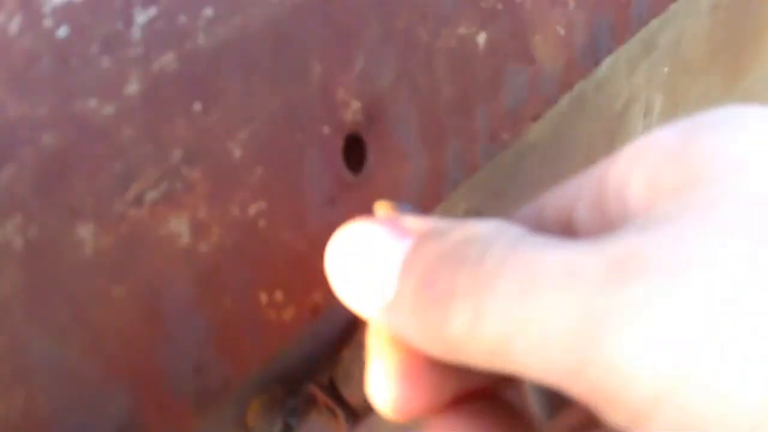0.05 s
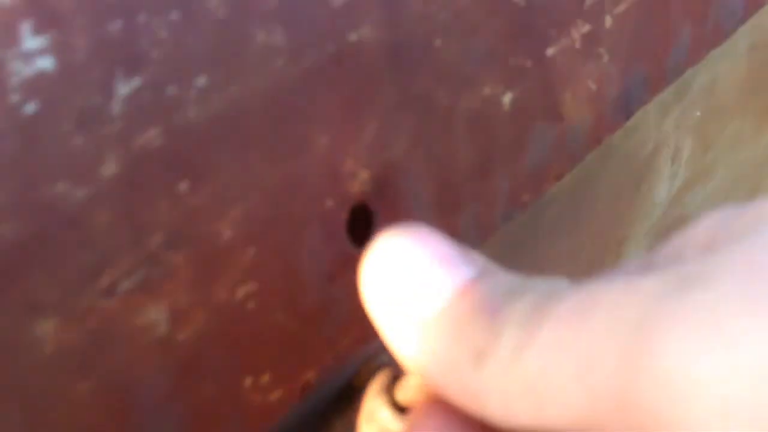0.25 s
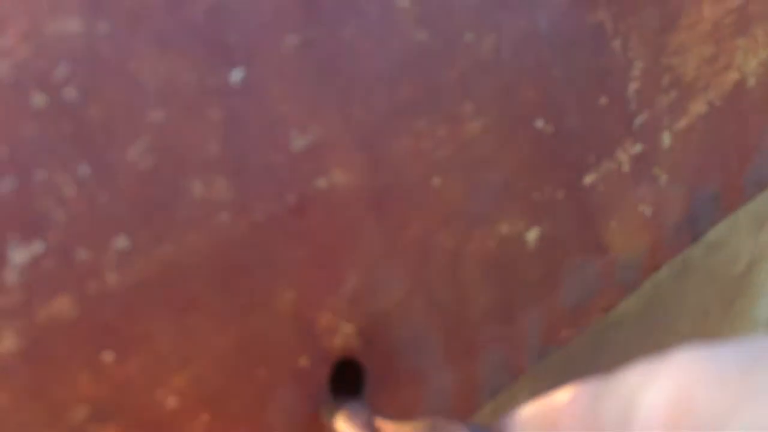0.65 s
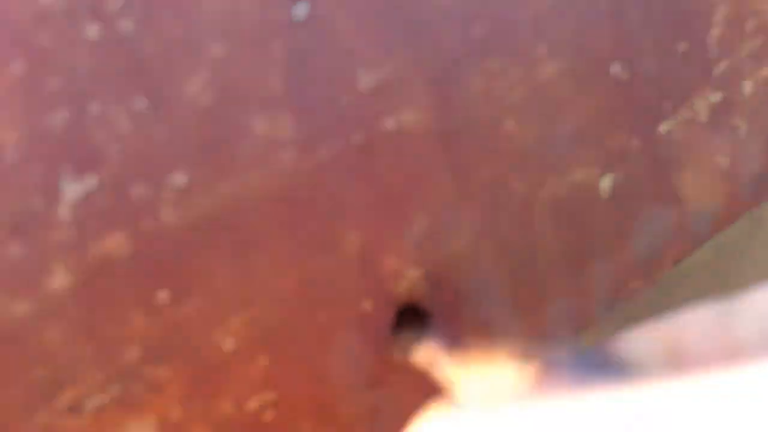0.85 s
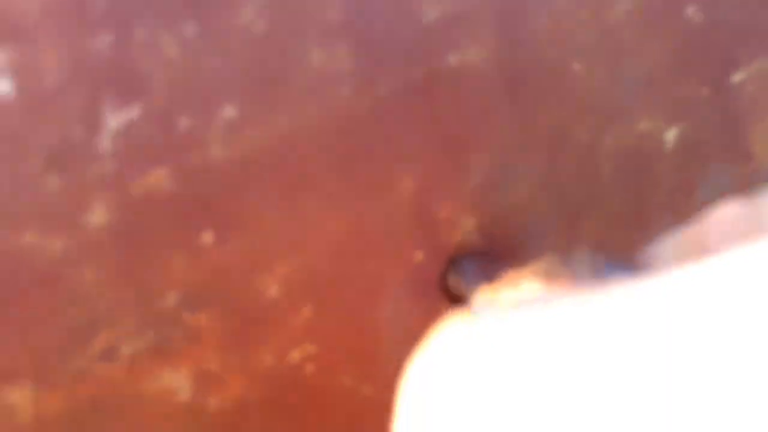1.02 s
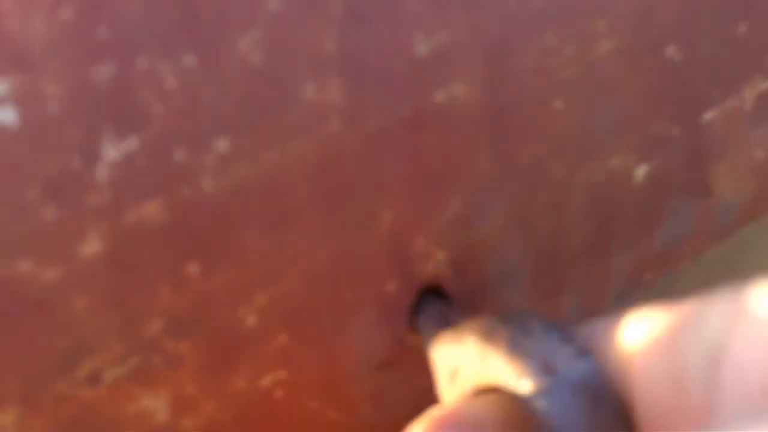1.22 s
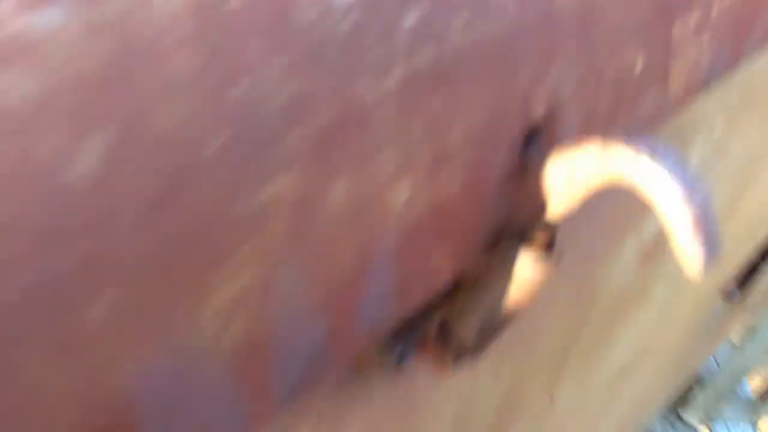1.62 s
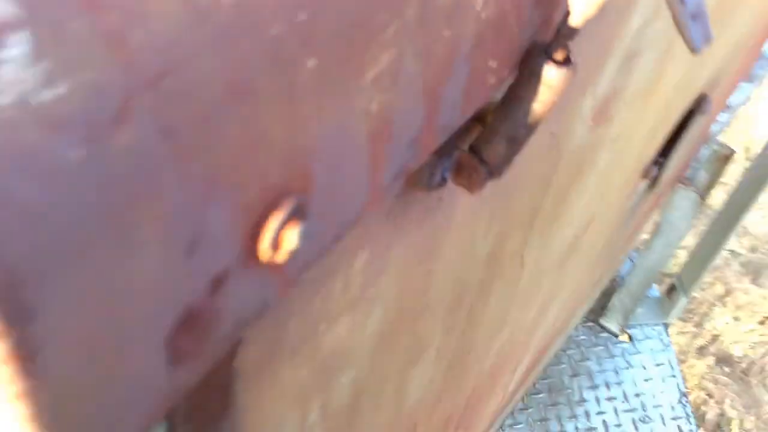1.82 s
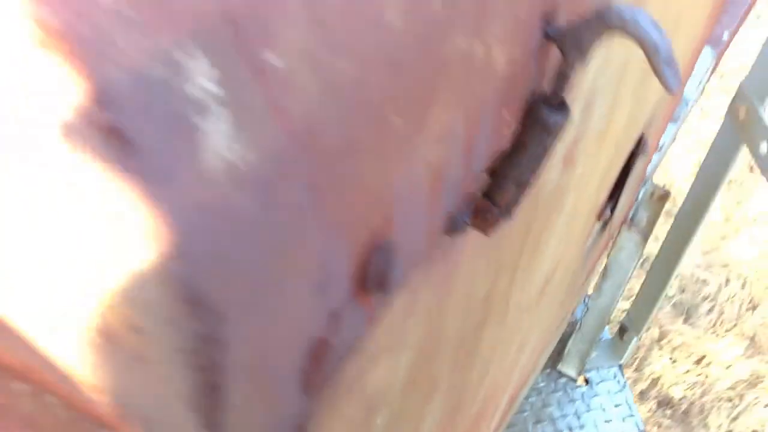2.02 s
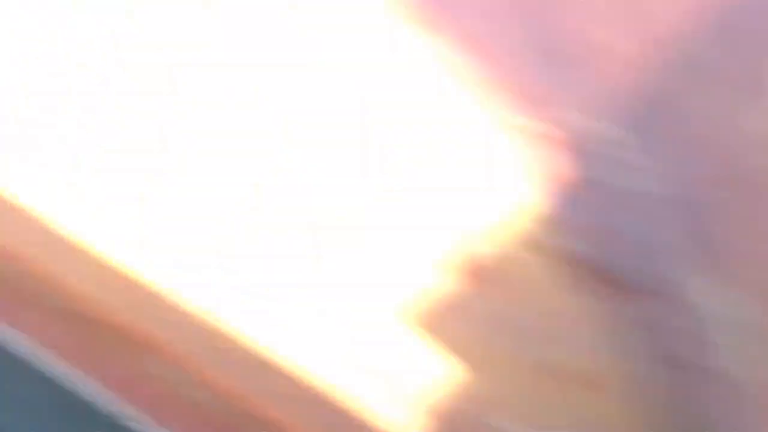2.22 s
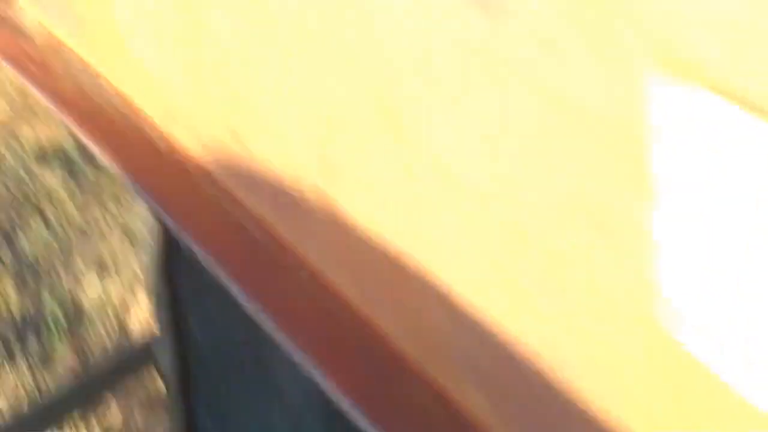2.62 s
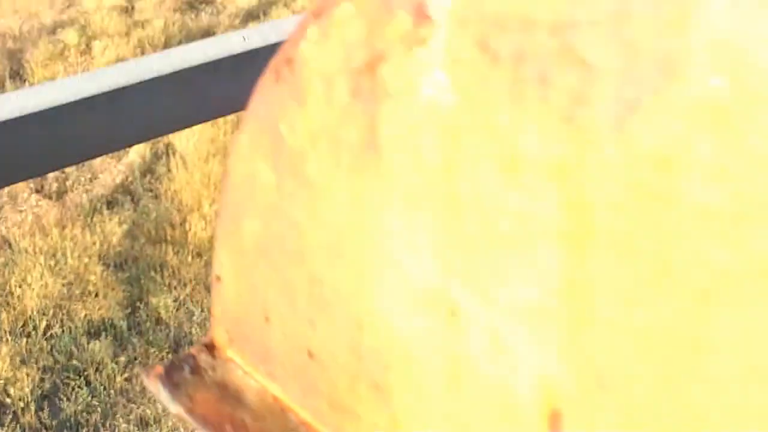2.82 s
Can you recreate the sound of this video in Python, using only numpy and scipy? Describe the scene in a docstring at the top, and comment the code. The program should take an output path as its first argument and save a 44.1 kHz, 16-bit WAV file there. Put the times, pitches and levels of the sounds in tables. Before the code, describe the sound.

Outdoors over a wind rumble, close, booming clangs ring from a steel sheet as a rusty hook is worked into it, with small pings and scratches. Then the microphone is bumped and a gritty scrape judders and catches.

```python
"""Outdoors, over a rumble of wind, a rusty hook latch is worked into a hole in a big sheet-steel panel.
The sheet is already ringing faintly as the hook's tip scratches over rust, close to the microphone.
Each knock booms and clangs in the sheet; on some the hook pings, and the hardest overload the microphone.
Then come dull handling bumps and, from about two seconds, a dry, gritty scrape that judders and catches."""
import sys
import numpy as np
from scipy import signal
from scipy.fft import rfft, irfft, next_fast_len
from scipy.io import wavfile
from scipy.ndimage import map_coordinates

SR = 44100
rng = np.random.default_rng(int(sys.argv[2]) if len(sys.argv) > 2 else 0)


def generate_wav(signal):
    """Clip the signal to [-1, 1] and save it as 16-bit WAV at the path in sys.argv[1]."""
    frames = np.transpose(np.atleast_2d(signal))
    scaled = np.clip(frames, -1, 1) * 32767
    pcm = np.round(scaled).astype(np.int16)
    wavfile.write(sys.argv[1], SR, pcm)


N = 130095
T = np.arange(N) / SR
JUDDER_PER_S = 130  # flutter of anything dragged over the surface
# the hook knocks on the panel:
# (time [s], boom [dB], clang [dB], click [dB], note of the struck spot [Hz], note level [dB])
KNOCK_HITS = [(.216, -20.5, -31, -32, 250, -25), (.351, -16.5, -29, -29, 509.7, -7.5),
              (0.392, -35, -37, -48, 372, -23), (.437, -26.5, -37.5, -36, 237, -18.5),
              (.543, -21.5, -32.5, -26, 497, -11.5), (.560, -19.5, -31.5, -24, 221, -9),
              (0.647, -15, -24.5, -24.5, 450, -32), (0.697, -13.5, -11.5, -2.5, 231, 1.5),
              (0.725, -13.5, -27, -13.5, 347, -8.5), (.751, -28, -33, -16, 676, -13),
              (.761, -49, -20.5, -21, 477, -12), (.891, -10.5, -21.5, -17, 590, -4.5),
              (.908, -11, -11.5, -14.5, 515, -22), (.946, -15.5, -45, -42, 643, -7.5),
              (1.031, -22.5, -37.5, -32.5, 244, -37), (1.065, -16.5, -36, -30.5, 230, -5),
              (1.079, -24, -26, -32, 177, -9.5), (1.112, -10.5, -22, -28, 230.6, -3.5),
              (1.125, -7.5, -11, -16, 465.6, -2), (1.163, -24, -22, -22, 174, -4),
              (1.186, -11.5, -30, -13.5, 329, -11), (1.191, -19, -9, -6.5, 158.7, -4.5),
              (1.222, -14, -19, -30, 640, -20), (1.256, -16.5, -46, -42, 467, -3)]


def amp(db):
    """Decibels to gain."""
    return 10 ** (np.asarray(db) / 20)


def unit(x):
    """Scale to rms 1."""
    return x / np.sqrt(np.mean(x ** 2))


def on_log(hz, points):
    """Read (Hz, value) points on a log-frequency axis."""
    freqs, values = np.array(points).T
    return np.interp(np.log(hz + 1e-3), np.log(freqs), values)


def curve(points):
    """Gain envelope from (s, dB) points."""
    return amp(np.interp(T, *np.array(points).T))


def fade(t60):
    """Free decay by 60 dB in t60 seconds."""
    return np.exp(-np.log(1000) * T / t60)


def swell(at, length):
    """A half-sine rise and fall."""
    return np.sin(np.pi * np.clip((T - at) / length, 0, 1))


def wander(axis, step):
    """Random values one step apart along an axis, joined by lines."""
    knots = np.arange(int(axis[-1] / step) + 2)
    return np.interp(axis / step, knots, rng.standard_normal(N)[:len(knots)])


def add(out, at, x):
    """Mix x in from a given time."""
    start = max(int(at * SR), 0)
    x = x[:N - start]
    out[start:start + len(x)] += x


def highpass(x, hz):
    """Gentle low cut."""
    return signal.sosfiltfilt(signal.butter(1, hz, "high", fs=SR, output="sos"), x)


def colour(x, eq):
    """Shape a signal with an EQ of (Hz, dB) points; rms 1."""
    size = next_fast_len(len(x))
    gain = amp(on_log(np.fft.rfftfreq(size, 1 / SR), eq))
    return unit(irfft(rfft(x, size) * gain, size)[:len(x)])


def noise(eq, size=N):
    """Coloured noise; rms 1."""
    return colour(rng.standard_normal(size), eq)


def resonant(x, ripple_db, spacing_hz):
    """Irregular peaks and dips, as from many resonances of unequal strength; rms 1."""
    size = next_fast_len(len(x))
    ripple = amp(ripple_db * wander(np.fft.rfftfreq(size, 1 / SR), spacing_hz))
    return unit(irfft(rfft(x, size) * ripple, size)[:len(x)])


def ring(modes, blows, scatter_db):
    """Decaying modes, struck with a slightly different mix on every blow."""
    out = np.zeros(N)
    for hz, db, t60 in modes:
        tone = amp(db) * fade(t60) * np.sin(2 * np.pi * hz * T)
        for (at, blow_db), chance in zip(blows, rng.standard_normal(len(blows))):
            add(out, at, amp(blow_db - scatter_db * chance) * tone)
    return out


def background(air_db=-38.5, hiss_db=-60, hiss_hz=11950, hiss_width_hz=120):
    """The bed: wind and handling rumble, outdoor air and a faint narrow hiss."""
    # rise and fall of the rumble: (time [s], level [dB])
    rumble_levels = [(0, -21.5), (.3, -25.5), (.6, -22), (1.75, -24.5), (1.95, -29.5), (2.06, -30.5),
                     (2.145, -14), (2.37, -24), (2.55, -22.5), (2.78, -34), (2.84, -37.5), (2.95, -44)]
    # EQs of the rumble and the air: (frequency [Hz], level [dB])
    rumble_eq = [(15, -2), (120, -6), (200, -10.5), (400, -20.5), (1000, -32), (3000, -61)]
    air_eq = [(200, -4), (450, -3), (1000, -9), (1400, -26.5), (9000, -31.5), (15000, -39)]
    peak = signal.iirpeak(hiss_hz, hiss_hz / hiss_width_hz, fs=SR)
    hiss = unit(signal.lfilter(*peak, rng.standard_normal(N)))
    return curve(rumble_levels) * noise(rumble_eq) + amp(air_db) * noise(air_eq) + amp(hiss_db) * hiss


def handling_bumps():
    """Soft, dull shoves against the microphone's case."""
    # each shove: (time [s], length [s], centre [Hz], level [dB])
    shoves = [(1.663, 0.05, 170, -18.5), (1.711, 0.047, 184, -16), (2.088, 0.034, 230, -16.5),
              (2.129, 0.049, 40.6, -16.5), (2.148, 0.014, 245, -16.5), (2.157, 0.018, 830, -24),
              (2.185, 0.027, 187, -18.5), (2.248, 0.029, 280, -21), (2.272, 0.014, 397, -22),
              (2.277, 0.046, 150, -23), (2.345, 0.023, 394, -28), (2.514, 0.02, 237, -25.5),
              (2.556, 0.032, 132, -27.5), (2.738, 0.029, 107, -23)]
    out = np.zeros(N)
    for at, length, hz, db in shoves:
        t = T[:int(length * SR)]
        thud = noise([(hz / 4, -6), (hz, 0), (hz * 2, -7), (hz * 4, -28), (hz * 10, -56)], SR // 2)
        add(out, at, amp(db) * unit(thud[:len(t)] * np.sin(np.pi * t / length)))
    return out


def grit(size, grains_per_s=16000, spread_db=1.3):
    """Dense tiny clicks, coloured by the resonances of one spot of the surface."""
    # EQ of the surface: (frequency [Hz], level [dB])
    surface_eq = [(400, -12), (800, -2), (1130, -10), (1380, 3.5), (1600, -6.5), (2100, 3.5), (2900, -1.5),
                  (4100, -0.5), (4750, -10.5), (6500, -4), (7700, -8), (9000, -7.5), (15000, -20.5)]
    strengths = rng.standard_normal(size) * amp(spread_db * np.minimum(rng.exponential(size=size), 4))
    grains = (rng.random(size) < grains_per_s / SR) * strengths
    clicks = colour(highpass(grains, hz=400), surface_eq)
    return resonant(clicks, ripple_db=3, spacing_hz=202.5)


def scrape(level_db=-2.5, judder_db=2, spots_per_s=9, glide_per_s=.5, bright_gain=16.8):
    """A juddering contact slides from spot to spot, its resonances gliding, brighter under pressure."""
    # pressure on the contact: (time [s], relative level [dB])
    pressure_levels = [(2.08, -51), (2.15, -46), (2.166, -25.5), (2.182, -24.5), (2.197, -43.5),
                       (2.22, -36), (2.23, -26), (2.255, -34.5), (2.35, -37.5), (2.457, -29), (2.464, -21),
                       (2.50, -20.5), (2.60, -20), (2.638, -14), (2.68, -21), (2.71, -25), (2.73, -33.5),
                       (2.805, -25), (2.87, -32.5)]
    slide = np.zeros(N)
    t, step = T[:SR // 2], 1 / spots_per_s
    crossfade = np.sqrt(swell(0, 2 * step)[:len(t)])
    for at in np.arange(pressure_levels[0][0] - step, T[-1], step):
        glide = glide_per_s * rng.standard_normal()  # relative pitch drift of this spot
        warped_time = t + glide * (t - step) ** 2 / 2
        spot = map_coordinates(grit(len(t)), [warped_time * SR], mode="mirror")
        add(slide, at, spot * crossfade)
    pressure = curve(pressure_levels)
    treble = bright_gain * pressure * highpass(slide, hz=7000)
    judder = amp(judder_db * wander(T, 1 / JUDDER_PER_S))
    return amp(level_db) * judder * pressure * (slide + treble)


def scrape_catches(t60=0.018):
    """The scrape snags now and then with a short knock and a crunch of grit."""
    # each snag: (time [s], knock [dB], crunch [dB])
    snags = [(2.164, -30, -25), (2.462, -14, -11.5), (2.480, -9, -18), (2.67, -23, -16), (2.674, -26, -6),
             (2.687, -8.5, -23), (2.691, -10.5, -32)]
    # EQ of the knock: (frequency [Hz], level [dB])
    knock_eq = [(200, -37), (800, 6.5), (1150, -12), (2000, 1), (4000, -8), (15000, -22)]
    knock, crunch = np.zeros(N), np.zeros(N)
    for at, knock_db, crunch_db in snags:
        add(knock, at, amp(knock_db) * fade(t60))
        add(crunch, at, amp(crunch_db) * fade(t60))
    return knock * noise(knock_eq) + crunch * grit(N)


def hook_scratches(judder_db=4):
    """The hook's tip judders over rust in short, bright strokes."""
    # each stroke: (time [s], length [s], level [dB])
    strokes = [(0.145, 0.059, -42.5), (0.19, 0.1, -39.5), (.382, 0.052, -35.5), (1, .1, -39)]
    # EQ of the rust: (frequency [Hz], level [dB])
    rust_eq = [(2000, -2), (3300, 0.5), (4600, -18), (6300, -12), (13000, -14)]
    envelope = sum(amp(db) * swell(at, length) for at, length, db in strokes)
    return envelope * noise(rust_eq) * amp(judder_db * wander(T, 1 / JUDDER_PER_S))


def hook_squeaks():
    """The hook sticks and slips on the rim of the hole."""
    # each squeak: (time [s], length [s], pitch [Hz], level [dB])
    slips = [(0.541, 0.0087, 6050, -21.5), (.646, .013, 699, -6), (0.653, 0.025, 646, -3.5)]
    return sum(amp(db) * swell(at, length) * np.sin(2 * np.pi * hz * (T - at))
               for at, length, hz, db in slips)


def hook_pings(off_pitch_db=-16, favour_octaves=0.06, chatter_depth=1.08, chatter_per_s=840):
    """The hook chatters as it rings free; each contact favours the modes near one pitch."""
    # each contact: (time [s], level [dB], favoured pitch [Hz])
    contacts = [(0.545, -22, 7100), (0.562, -17.5, 5375), (.695, -10.5, 6000), (1.161, -31, 5100),
                (1.19, -4, 5040)]
    # modes of the hook: (frequency [Hz], relative level [dB], t60 [s])
    modes = [(2720, 2, 0.2), (3620, 2, 0.083), (5100, 2, 0.042), (5340, -8, 0.28), (5990, -3.5, 0.059),
             (10750, 2, 0.1)]
    out = np.zeros(N)
    for mode in modes:
        blows = []
        for at, db, hz in contacts:
            nearness = np.exp(-(np.log2(mode[0] / hz) / favour_octaves) ** 2)
            blows.append((at, db + off_pitch_db * (1 - nearness)))
        ping = ring([mode], blows, scatter_db=2)
        out += ping * (1 + chatter_depth * wander(T, 1 / chatter_per_s))
    return out


def sheet_wash(dense_modes, blows, rise_s):
    """Countless close modes in half-octave bands: each blow feeds them, and the highs die first."""
    # ring time of the steel: (frequency [Hz], t60 [s])
    ring_times = [(100, 1.86), (260, 1.46), (700, 0.68), (1500, 0.45), (3000, 0.29), (5000, 0.26),
                  (13000, 0.13)]
    size = next_fast_len(N)
    spectrum, freqs = rfft(dense_modes, size), np.fft.rfftfreq(size, 1 / SR)
    push, out = np.zeros(N), np.zeros(N)
    for at, db in blows:
        add(push, at, np.array([amp(db) ** 2]))
    soften = np.exp(-1 / (rise_s * SR))
    push = signal.lfilter([1 - soften], [1, -soften], push)
    edges_hz = 45 * 2 ** (np.arange(19) / 2)
    for lo, hi in zip(edges_hz, edges_hz[1:]):
        t60 = on_log(np.sqrt(lo * hi), ring_times)
        retained = np.exp(-2 * np.log(1000) / (t60 * SR))
        energy = signal.lfilter([1], [1, -retained], push + 1e-18)
        band = irfft(spectrum * ((freqs >= lo) & (freqs < hi)), size)[:N]
        out += np.sqrt(energy) * band
    return out


def panel_boom():
    """The body of each knock: a low wash of the whole sheet, with a few modes standing out."""
    # EQ of the boom: (frequency [Hz], level [dB])
    boom_eq = [(60, -12), (170, -1), (490, 0), (670, -3), (1000, -7.5), (1250, -20.5), (1900, -23.5),
               (4000, -54)]
    # standout modes: (frequency [Hz], level against the boom [dB], t60 [s])
    modes = [(168.4, -25, 1.3), (239.4, -9.5, 0.91), (343, -12.5, 1.63), (464, -12, 0.44), (597, -19, 1.14),
             (664, -9, 0.44), (711, -13, 0.78), (820, -12.5, 0.5), (950, -16, 0.34), (1043, -12, 0.34),
             (1476, -21.5, 0.4)]
    blows = [(at, boom_db) for at, boom_db, *_ in KNOCK_HITS]
    already_ringing = [(0.012, -29.5)]  # (time [s], level [dB])
    wash = sheet_wash(noise(boom_eq), already_ringing + blows, rise_s=0.0014)
    return wash + ring(modes, blows, scatter_db=3.5)


def panel_clang():
    """The metallic edge of each knock: the sheet's uneven upper resonances."""
    # EQ of the clang: (frequency [Hz], level [dB])
    clang_eq = [(700, -15.5), (1250, -12), (1460, -0.5), (1800, -11), (2350, 2.5), (3100, 2.5),
                (3800, -1.5), (4500, -9), (5200, -8), (6300, -6.5), (8000, -15), (15000, -24)]
    blows = [(at, clang_db) for at, _, clang_db, *_ in KNOCK_HITS]
    already_ringing = [(0.0058, -42)]  # (time [s], level [dB])
    metal = resonant(noise(clang_eq), ripple_db=2.6, spacing_hz=44.9)
    return sheet_wash(metal, already_ringing + blows, rise_s=0.0015)


def panel_strikes(rattle_db=3, rattles_per_s=590, note_rise_s=0.00086, overtone=1.93, overtone_db=-17):
    """The attack of each knock: a click that rattles on the rust, and two modes of the struck spot."""
    # EQ of the click: (frequency [Hz], level [dB])
    click_eq = [(800, -19), (2500, -1.5), (4200, -3), (5200, 4), (6300, 5.5), (7600, -9.5), (11500, -4),
                (15000, -8.5)]
    out, span = np.zeros(N), SR // 2
    t = T[:span]
    click_shape = fade(t60=0.053)[:span]
    note_shape = fade(t60=0.17)[:span] * (1 - np.exp(-t / note_rise_s))
    for at, _, _, click_db, hz, note_db in KNOCK_HITS:
        click = resonant(noise(click_eq, span), ripple_db=4, spacing_hz=305)
        rattle = unit(amp(rattle_db * wander(t, 1 / rattles_per_s)))
        add(out, at, amp(click_db) * click_shape * rattle * click)
        phase = 2 * np.pi * hz * t
        note = np.sin(phase) + amp(overtone_db) * np.sin(overtone * phase)
        add(out, at, amp(note_db) * note_shape * note)
    return out


def scene():
    """All sources at one microphone."""
    panel = panel_boom() + panel_clang() + panel_strikes()
    hook = hook_pings() + hook_scratches() + hook_squeaks()
    return (panel + hook + handling_bumps() + scrape() + scrape_catches() + background())[None]


def record(dry, top_hz=15400):
    """The input clips on the hardest knocks; a steep low-pass cuts the top."""
    lowpass = signal.ellip(12, .1, 90, top_hz, fs=SR, output="sos")
    return signal.sosfilt(lowpass, np.clip(dry, -1, 1))


dry = scene()
out = record(dry)
generate_wav(out)
```